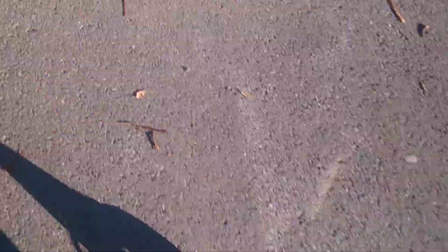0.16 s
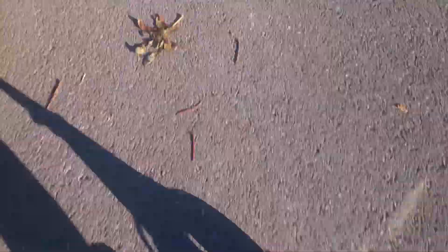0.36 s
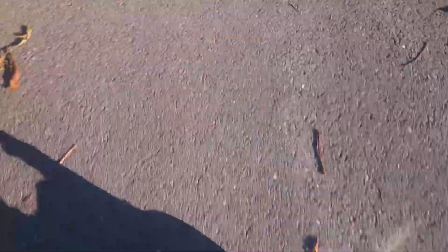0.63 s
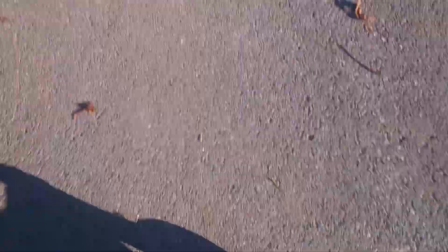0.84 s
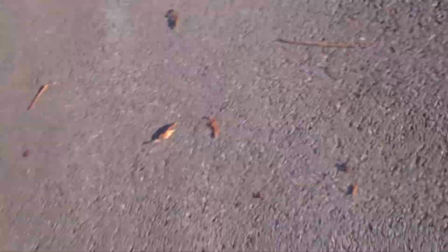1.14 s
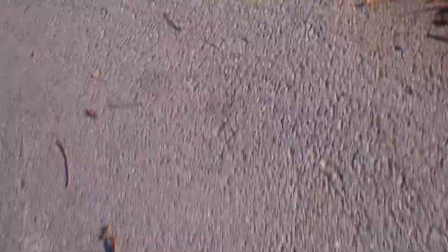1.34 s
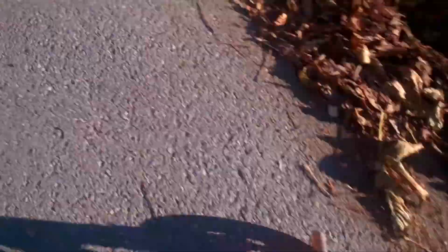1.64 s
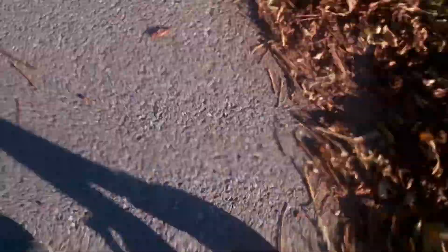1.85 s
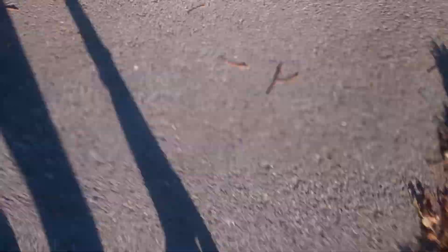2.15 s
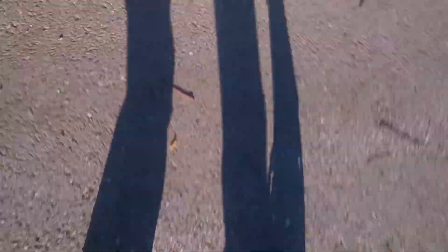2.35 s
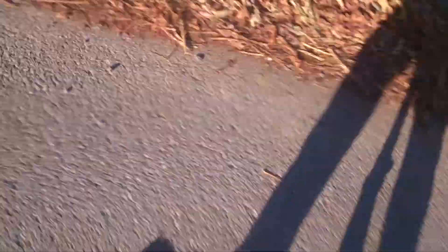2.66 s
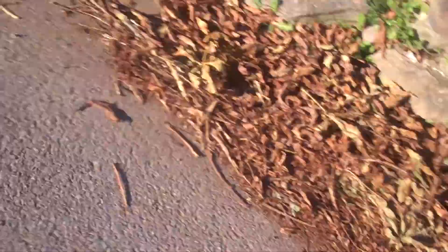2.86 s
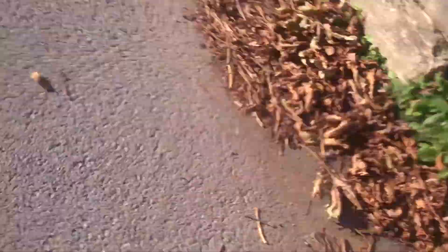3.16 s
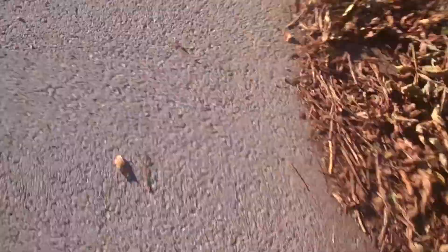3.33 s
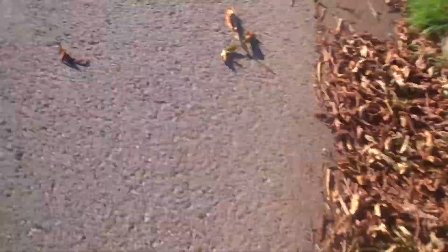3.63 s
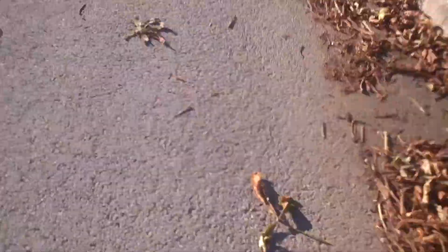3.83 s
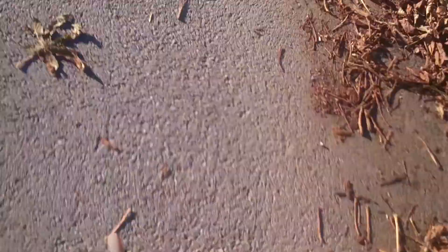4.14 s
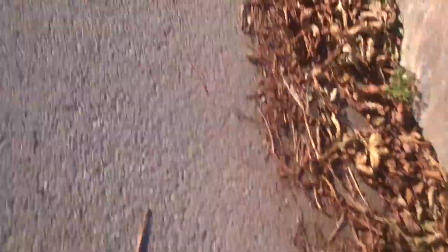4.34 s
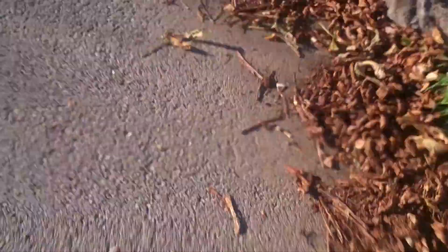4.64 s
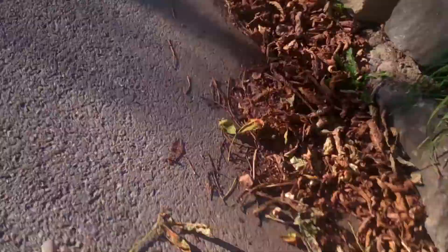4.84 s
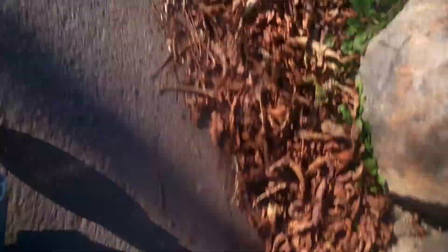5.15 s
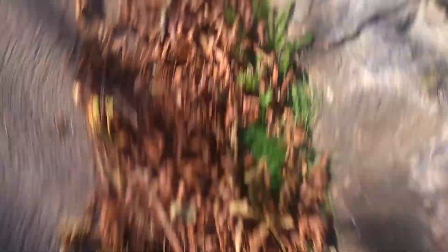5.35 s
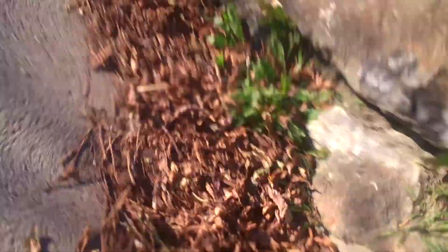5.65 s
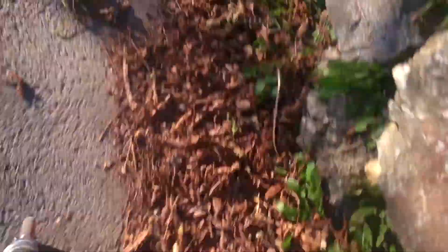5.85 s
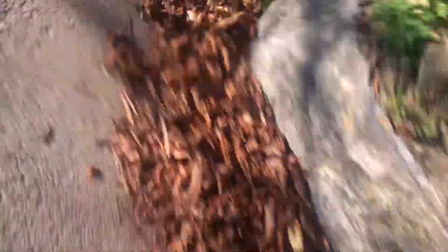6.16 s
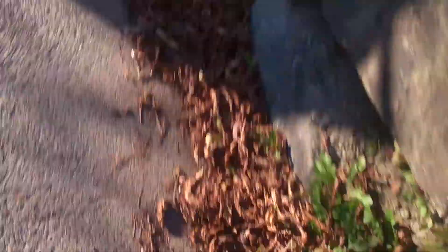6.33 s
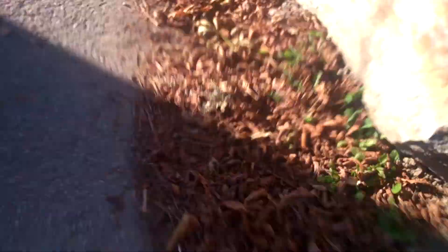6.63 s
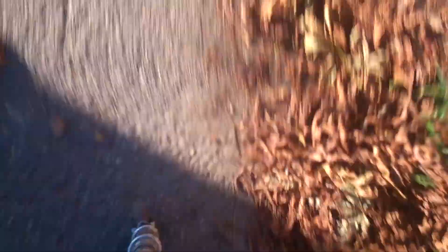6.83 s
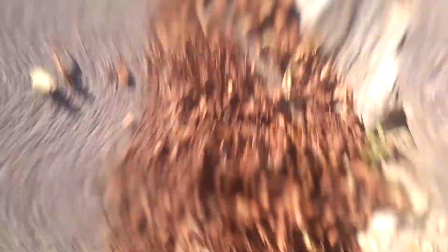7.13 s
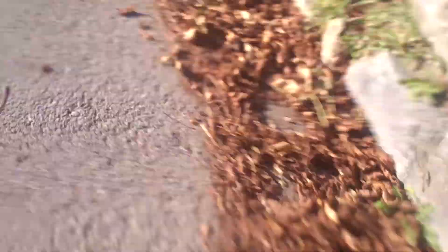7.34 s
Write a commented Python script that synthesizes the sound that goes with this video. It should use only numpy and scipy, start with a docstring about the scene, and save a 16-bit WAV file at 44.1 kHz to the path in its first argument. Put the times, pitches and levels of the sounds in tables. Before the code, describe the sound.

Small hard wheels hiss and tick over rough pavement, quiet at first, then shaken by uneven low rumble with a thin metallic-like rattle. Twigs crack singly, then thickly, as the wheels run into dry leaves at the kerb. Bright crunching comes in bursts among dull thuds and a few distorted knocks. Close, dry outdoor sound in a hand-held stereo microphone, rumble leaning right, growing rougher until it stops mid-roll.

```python
"""Kick scooter from asphalt into leaves

A kick scooter on small hard wheels rolls over coarse asphalt, later into dry leaves and twigs at the kerb.
Low resonances shake a hand-held stereo recorder (mostly more on the right) and banded noise hisses as grit.
A loose part rattles as resonant noise, dense grains drag now and then, noise bursts crunch and crack.
The hardest knocks overdrive one capsule: a draining offset, folded by a sine, becomes a falling sweep.
"""
import sys
import numpy as np
from scipy import signal
from scipy.fft import rfft, irfft
from scipy.io import wavfile

SR = 44100
rng = np.random.default_rng(int(sys.argv[2]) if len(sys.argv) > 2 else 0)


def gain_from_decibels(decibels):
    """Convert decibel values to linear amplitude factors."""
    exponent = np.asarray(decibels, float) / 20
    return 10 ** exponent


def put_to_file(sound):
    """Save the sound as 16-bit audio at rate SR, in the file named by the first command-line argument."""
    columns = np.atleast_2d(sound).T  # one column per channel
    safe = np.clip(columns, -1, 1)
    whole_steps = np.round(safe * 32767)
    wavfile.write(sys.argv[1], SR, whole_steps.astype(np.int16))


N = 330309

# Shaking of the recorder. Each row: time in seconds, rumble level in dB before panning.
SHAKE = [(0.0, -40), (1.96, -26), (3.21, -35.5), (3.4, -23), (3.65, -42.5), (4.11, -17), (4.46, -35),
         (4.53, -21), (5.01, -28.5), (5.7, -18), (6.17, -32.5), (6.7, -13.5), (7.05, -34.5), (7.09, -19.5),
         (7.49, -24.5)]
# Low modes of frame and hand. Each row: pitch in Hz, width in Hz, relative level in dB.
RUMBLE_MODES = [(41, 2.7, 10.5), (59.6, 16.9, 16.5), (79, 13.5, 4.5)]
# The roll. Each row: time in seconds, wheel hiss in dB before panning, rumble left minus right in dB,
# thud level in dB before panning.
ROLL = [(0.0, -45, 1, -44.5), (1.68, -43.5, -7, -49), (2.13, -35, -14, -78), (2.7, -41, -9, -38.5),
        (3.53, -40.5, -3, -56), (3.86, -37, -12.5, -34), (4.78, -52.5, -4.5, -25), (5.26, -32, -6.5, -23.5),
        (7.05, -33, -13, -34), (7.48, -28.5, -14.5, -15)]
# Tone of the wheel hiss. Each row: frequency in Hz, relative gain in dB.
WHEEL_COLOUR = [(150, 7.5), (260, 3.5), (480, -4), (1150, 0), (1600, -12), (2870, -5.5), (4020, -18),
                (9600, -23), (15500, -48)]
# Stereo likeness of the hiss. Each row: frequency in Hz, left-right correlation (1 is mono).
LIKENESS = [(60, 0.86), (950, 0.88), (15000, -0.57)]
# Heaps of leaves and twigs under the wheels. Each row: start in seconds, length in seconds, crunch in dB.
HEAPS = [(3.709, 0.11, -28.5), (4.203, 0.19, -36.5), (4.462, 0.035, -24.5), (4.564, 0.42, -38),
         (5.014, 0.12, -22), (5.184, 0.13, -15), (5.287, 0.28, -26), (6.066, 0.17, -25),
         (6.306, 0.08, -15.5), (6.428, 0.84, -30), (6.917, 0.11, -14), (7.123, 0.11, -16.5),
         (7.231, 0.094, -20)]
# Tone of crunch and cracks. Each row: frequency in Hz, relative gain in dB.
CRACK_COLOUR = [(250, -8.5), (1200, -3), (2300, -0.5), (4400, -6), (5400, -14.5), (8800, -7.5),
                (12000, -18.5), (15500, -26)]
# Something drags on the road. Each row: start in seconds, length in seconds, level in dB, centre in Hz.
SCRAPES = [(0.029, 0.25, -32, 2000), (3.116, 0.14, -30, 1115), (6.31, 0.091, -23.5, 1240),
           (6.964, 0.25, -24, 1120)]
# Resonances of the dragged piece. Each row: multiple of the centre, relative level in dB.
DRAG_MODES = [(0.62, 0), (1, 6.5), (2.4, -5.5)]
# Single cracks, and one low bump at 4.558 s made the same way. Each row: time in seconds, relative level in dB,
# ring pitch in Hz.
CRACKS = [(0.0445, -10.5, 2000), (0.0749, -13.5, 1840), (0.094, -14, 2310), (0.188, -11, 2720),
          (0.201, -13, 2020), (0.241, -16.5, 1880), (0.335, -18.5, 2450), (0.398, -27, 2890),
          (0.461, -26.5, 1620), (0.580, -31.5, 1360), (0.611, -27, 1470), (1.4687, -17.5, 8000),
          (2.07, -18.5, 3230), (2.272, -15, 3370), (2.78, -15, 5040), (2.939, -20.5, 1980),
          (3.152, -18.5, 1310), (3.195, -17, 2200), (3.2116, -11.5, 2850), (3.288, -16.5, 3000),
          (3.335, -13, 2290), (3.669, -14, 1520), (3.7341, -6.5, 1370), (3.791, -9.5, 2200),
          (3.8038, -8, 1350), (3.8823, -4.5, 3690), (3.9261, -6.5, 1930), (3.953, -11, 2760),
          (3.97, -8, 2000), (3.986, -6, 2270), (4.0859, -16.5, 2500), (4.1072, -16.5, 2460),
          (4.1274, -15, 2920), (4.19, -28, 5030), (4.234, -11, 2420), (4.2768, -8.5, 2500),
          (4.318, -9.5, 1510), (4.3302, -3.5, 6500), (4.473, -8.5, 1400), (4.558, -13, 318),
          (4.579, -2.5, 2170), (4.619, -10, 1690), (4.644, -5, 1990), (4.665, -4.5, 2600),
          (4.7292, -8.5, 2350), (4.88, -12, 1920), (4.938, -12, 2380), (5.048, -4.5, 1980),
          (5.071, -4.5, 4600), (5.27, -2, 1930), (5.339, -4.5, 3180), (5.4029, -4.5, 3440),
          (5.4756, -1, 6340), (5.559, 1, 6300), (5.7317, -4, 4530), (6.021, -10.5, 2030),
          (6.074, -10, 2150), (6.1578, -2.5, 2310), (6.212, -9.5, 1340), (6.297, -5.5, 1300),
          (6.309, 0.5, 1500), (6.395, -6.5, 5900), (6.447, -3.5, 4070), (6.4695, -8, 2160),
          (6.484, -1.5, 3340), (6.5269, -3.5, 2410), (6.5917, -9.5, 2420), (6.6088, -4, 2330),
          (6.621, -9.5, 2520), (6.654, -8, 4400), (6.681, -6, 3270), (6.695, 1, 6500), (6.7648, -8, 4550),
          (6.9195, -3.5, 3400), (6.9446, -1, 3530), (7, 1, 2280), (7.06, 4.5, 3870), (7.078, 1, 3600),
          (7.088, -3, 4170), (7.121, -4, 3280), (7.151, 2.5, 4730), (7.193, 1, 2380), (7.2928, -3, 2550),
          (7.305, 2, 6300), (7.342, -3.5, 4640), (7.4, -2, 4250)]
# The loose part. Each row: time in seconds, rattle level in dB before panning.
RATTLE = [(1.45, -55), (1.7, -45.5), (2.15, -43), (2.36, -51), (2.5, -44.5), (2.85, -56.5), (3.7, -44.5)]
# Knocks that overdrive one capsule, the first on the left, the others on the right.
# Each row: time in seconds, first pitch of the sweep in Hz, fading time constant in seconds.
KNOCKS = [(5.0944, 4840, 0.0014), (5.2358, 2184, 0.0062), (5.275, 1740, 0.0023), (5.283, 678, 0.0062),
          (5.295, 2180, 0.00304), (5.302, 1113, 0.00395), (7.203, 1170, 0.00553), (7.2118, 735, 0.00414),
          (7.218, 993, 0.0049)]


def rms_one(x):
    """Scale to unit rms."""
    return x / np.sqrt(np.mean(x ** 2) + 1e-20)


def in_time(rows):
    """Columns of a curve, one value a sample."""
    s, *columns = np.transpose(rows)
    return [np.interp(np.arange(N) / SR, s, c) for c in columns]


def at_hz(points, hz):
    """Read a spectrum on a log frequency axis."""
    points = np.array(points)
    return np.interp(np.log(hz), np.log(points[:, 0]), points[:, 1])


def drift(rate_hz):
    """Slow random wander of unit rms: noise through two equal poles, made on every 40th sample."""
    r = np.exp(-80 * np.pi * rate_hz / SR)
    noise = rng.standard_normal(N // 40 + 2002)
    slow = signal.lfilter([1], [1, -2 * r, r * r], noise)[2000:]
    return np.interp(np.arange(N) / 40, np.arange(len(slow)), rms_one(slow))


def resonance(x, hz, width_hz):
    """Two-pole resonance with gain 1 on top."""
    r = np.exp(-np.pi * width_hz / SR)
    zeros = np.array([1, 0, -1]) * (1 - r * r) / 2
    return signal.lfilter(zeros, [1, -2 * r * np.cos(2 * np.pi * hz / SR), r * r], x)


def colour(x, spectrum):
    """Shape by a spectrum with its minimum phase, so that nothing sounds early."""
    log_gain = np.log(gain_from_decibels(at_hz(spectrum, np.arange(1025).clip(1) * SR / 2048)))
    cepstrum = irfft(log_gain)
    cepstrum[1:1024] *= 2
    cepstrum[1025:] = 0
    impulse = irfft(np.exp(rfft(cepstrum)))
    return signal.fftconvolve(x, impulse[None], axes=1)[:, :N]


def apart(pan_db):
    """Left and right gain from left minus right in dB."""
    return gain_from_decibels(np.array([pan_db / 2, -pan_db / 2]))


def from_one_side(length, alike):
    """Noise for both capsules; the shared part reaches the right one 7 samples later."""
    noise = rng.standard_normal((3, length))
    shared = np.array([noise[0], np.roll(noise[0], 7)])
    return np.sqrt(np.clip(alike, 0, 1)) * shared + np.sqrt(np.clip(1 - alike, 0, 1)) * noise[1:]


def passing_db(start, length, rise_db_per_s, fall_db_per_s):
    """Rise, hold at 0 dB, fall."""
    s = np.arange(N) / SR
    return -rise_db_per_s * np.maximum(start - s, 0) - fall_db_per_s * np.maximum(s - start - length, 0)


def rumble():
    """Lumpy shaking rings the low modes of frame and hand, separately at each capsule."""
    thud_hz, thud_width_hz = 115, 25.5
    _, pan_db, thud_db = in_time(ROLL)
    lumps_db = 3.3 * np.array([drift(12.0), drift(38)])
    push = rng.standard_normal((2, N)) * gain_from_decibels(lumps_db)
    low = 0
    for hz, width_hz, db in RUMBLE_MODES:
        low = low + gain_from_decibels(db) * resonance(resonance(push, hz, 2 * width_hz), hz, width_hz)
    low = rms_one(low)
    # the push turned round in time and side serves as a second noise
    thud = rms_one(resonance(push[::-1, ::-1], thud_hz, thud_width_hz))
    shaking = apart(pan_db) * (gain_from_decibels(in_time(SHAKE)[0]) * low + gain_from_decibels(thud_db) * thud)
    return shaking, low[1]


def wheels():
    """Grit under the tread: dense hiss in half-octave bands, flickering together and each alone."""
    out, together = 0, drift(25)
    edges = 180 * 2 ** np.arange(0, 7, .5)
    white = rng.standard_normal((2, 2, N))
    for k, (low, high) in enumerate(zip(edges, edges[1:])):
        band = signal.butter(2, [low, high], "band", fs=SR, output="sos")
        mid, side = signal.sosfilt(band, white[k % 2])   # neighbouring bands differ in noise
        alike = np.clip(at_hz(LIKENESS, np.sqrt(low * high)), -1, 1)
        stereo = np.sqrt(1 + alike) * mid + np.sqrt(1 - alike) * side * [[1], [-1]]
        out = out + gain_from_decibels(2 * together + drift(14.0)) * stereo
    hiss = rms_one(colour(out, WHEEL_COLOUR))
    return gain_from_decibels(in_time(ROLL)[0]) * hiss * apart(np.array([2.5]))


def ticks():
    """Stones flicked by the tread: thin noise clicks in loose clumps all along the roll."""
    ticks_per_s, over_hiss_db, decay_s = 27, -11.5, 0.0057
    born = rng.random(N) < ticks_per_s * gain_from_decibels(4.0 * drift(4)) / SR
    sizes = born * gain_from_decibels(5.2 * np.minimum(rng.exponential(1, N), 3))
    envelope = signal.lfilter([1], [1, -np.exp(-1 / (decay_s * SR))], sizes + 1e-18)
    puff = envelope * from_one_side(N, alike=0.085)
    thin = signal.sosfilt(signal.butter(2, [3800, 11000], "band", fs=SR, output="sos"), puff)
    return gain_from_decibels(in_time(ROLL)[0] + over_hiss_db) * rms_one(thin)


def crunch_db():
    """Loose grit follows the hiss; each heap comes in fast, holds while the wheel crosses it and dies away."""
    grit_over_hiss_db, rise_db_per_s, fall_db_per_s = -6.5, 900, 251
    power = gain_from_decibels(2 * (in_time(ROLL)[0] + grit_over_hiss_db))
    for start, length, db in HEAPS:
        power = power + gain_from_decibels(2 * (db + passing_db(start, length, rise_db_per_s, fall_db_per_s)))
    return 10 * np.log10(power)


def crunch():
    """Small snaps in clumps, noise puffs of a few ms each with its pitch; harder is denser and brighter."""
    level_db = crunch_db()
    force_db = level_db + 38
    per_s = 200 * gain_from_decibels(0.38 * force_db)
    born = rng.random(N) < per_s * gain_from_decibels(3.0 * drift(30)) / SR
    sizes = born * gain_from_decibels(1.95 * np.minimum(rng.exponential(1, N), 3)) / np.sqrt(per_s)
    dealt, out = rng.integers(0, 14, N), np.zeros((2, N))   # each snap is dealt one of 14 pitches
    r = np.exp(-1 / (0.0034 * SR))   # puffs die in 3.4 ms
    for k, hz in enumerate(np.geomspace(900, 10000, num=14)):
        envelope = signal.lfilter([1], [1, -r], sizes * (dealt == k) + 1e-18)
        puff = envelope * from_one_side(N, alike=0.21)
        brightness = gain_from_decibels(0.12 * force_db * np.log2(hz / 2500))
        out += brightness * resonance(puff, hz, 0.13 * hz) + 0.27 * puff
    return gain_from_decibels(level_db) * rms_one(colour(out, CRACK_COLOUR))


def scrapes():
    """Dense catches on the grit, heard through the wide resonances of the dragged piece."""
    grains_per_s, grain_s, rise_db_per_s, fall_db_per_s = 2700, 0.0002, 400, 166
    born = rng.random(N) < grains_per_s / SR
    sizes = born * gain_from_decibels(1.4 * np.minimum(rng.exponential(1, N), 3) + 3.5 * drift(44))
    envelope = signal.lfilter([1], [1, -np.exp(-1 / (grain_s * SR))], sizes)
    grains = envelope * from_one_side(N, alike=0.08)
    out = 0
    for start, length, db, centre_hz in SCRAPES:
        body = 0
        for ratio, mode_db in DRAG_MODES:
            hz = ratio * centre_hz
            body = body + gain_from_decibels(mode_db) * resonance(resonance(grains, hz, 0.59 * hz), hz, 0.79 * hz)
        level_db = db + passing_db(start, length, rise_db_per_s, fall_db_per_s)
        out = out + gain_from_decibels(level_db) * rms_one(body)
    return out


def cracks():
    """Each crack: a sharp broad snap, a ring at its own pitch and two weaker after-snaps."""
    broad, rung = np.zeros((2, N + 2048)), np.zeros((2, N + 2048))
    t = np.arange(2048) / SR
    for s, db, hz in CRACKS:
        later, size, place = 0.014 * rng.random(2), 0.44 * rng.random(2), rng.normal(size=1)
        lasts = 0.0027 * gain_from_decibels(0.34 * db)   # a harder break lasts longer
        tear_s = 0.0016 + lasts * (hz / 7000) ** 2   # thin, high ones tear more slowly
        shape = np.exp(-t / lasts) * np.tanh(t / tear_s)
        shape = shape + sum(a * (t > d) * np.exp(-(t - d) / lasts) for d, a in zip(later, size))
        shape = shape + 0.053 * np.exp(-t / 0.016)   # the pieces rustle on
        burst = shape * from_one_side(len(t), alike=0.29)
        burst[:, 0] += 2.2   # the break itself is one click
        higher_hz = min(hz * (1.3 + rng.random()), 9000)
        ring = resonance(burst, hz, 0.14 * hz) + 0.6 * resonance(burst, higher_hz, 0.031 * hz)
        # thick pieces snap duller
        burst = signal.lfilter([1], [1, -np.exp(-2 * np.pi * 3.35 * hz / SR)], burst)
        i, gain = round(s * SR), gain_from_decibels(db) * apart(-3.0 + 5.0 * place)
        broad[:, i:i + len(t)] += gain * burst / np.abs(burst).max()
        rung[:, i:i + len(t)] += gain * ring / np.abs(ring).max()
    return gain_from_decibels(9.0) * colour(broad[:, :N], CRACK_COLOUR) + gain_from_decibels(-4.5) * rung[:, :N]


def rattle(shake):
    """The loose part chatters in noise through a high resonance, louder as the shaking swings upward."""
    hz, width_hz = 7830, 650
    s = np.arange(N) / SR
    on = (s > RATTLE[0][0]) & (s < RATTLE[-1][0])
    touch = 0.19 + np.maximum(shake, 0)
    ring = resonance(rng.standard_normal((2, N)) * touch, hz, width_hz)
    ring = rms_one(resonance(ring, hz, 2 * width_hz))
    return on * gain_from_decibels(in_time(RATTLE)[0]) * ring * apart(np.array([-7.0]))


def knocks():
    """A huge offset that drains away unevenly, with a low swing of the hand that dies more slowly."""
    swing_db, swing_hz, swing_s = 0, 48, 0.02
    out = np.zeros((2, N))
    t = np.arange(4096) / SR
    for k, (s, first_hz, fading) in enumerate(KNOCKS):
        judder = rms_one(resonance(rng.standard_normal(len(t)), 300, 300))
        # read as a phase in radians, this offset starts out turning at first_hz
        offset = 2 * np.pi * first_hz * fading * np.exp(-t / fading)
        offset = offset + .5 * judder * np.tanh(offset / 2)   # judder roughens the sweep while it lasts
        swing = gain_from_decibels(swing_db) * np.exp(-t / swing_s) * np.sin(2 * np.pi * swing_hz * t)
        i = round(s * SR)
        out[int(k > 0), i:i + len(t)] += offset + swing
    return out


def scene():
    """All sources, outdoors and close."""
    shaking, shake = rumble()
    rolling = shaking + wheels() + ticks() + crunch()
    return rolling + scrapes() + cracks() + rattle(shake) + knocks()


def top_cut(x):
    """Nothing passes above the cut-off."""
    return signal.sosfilt(signal.butter(12, 15680, fs=SR, output="sos"), x)


def record(dry):
    """Overload folds back like a sine, so a draining offset is heard as a full-scale falling sweep."""
    folded = np.sin(dry)
    low_cut = signal.butter(2, 15, "high", fs=SR, output="sos")   # 15 Hz
    mix = np.clip(signal.sosfilt(low_cut, folded), -1, 1)
    return top_cut(mix)


dry = scene()
out = record(dry)
put_to_file(out)
```